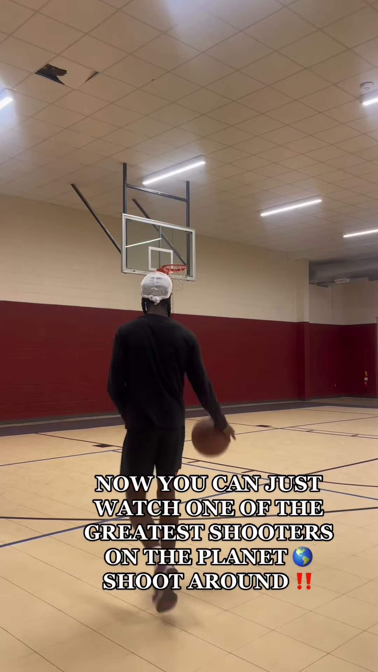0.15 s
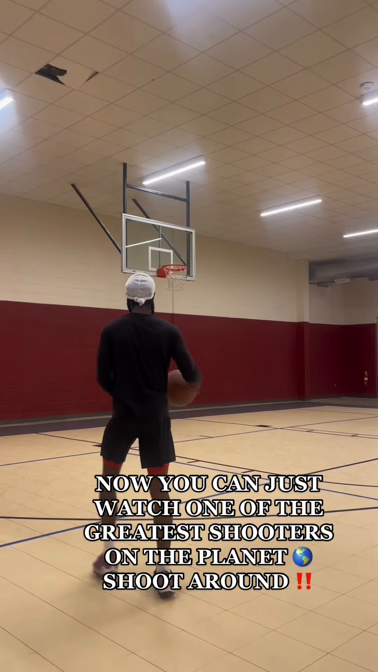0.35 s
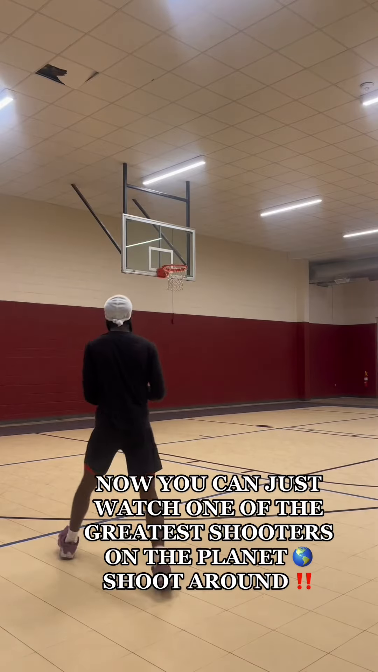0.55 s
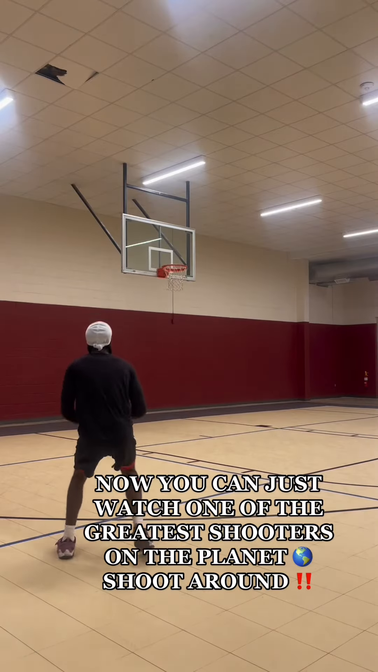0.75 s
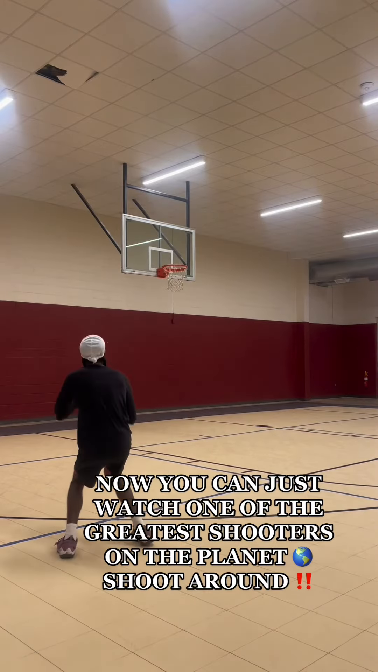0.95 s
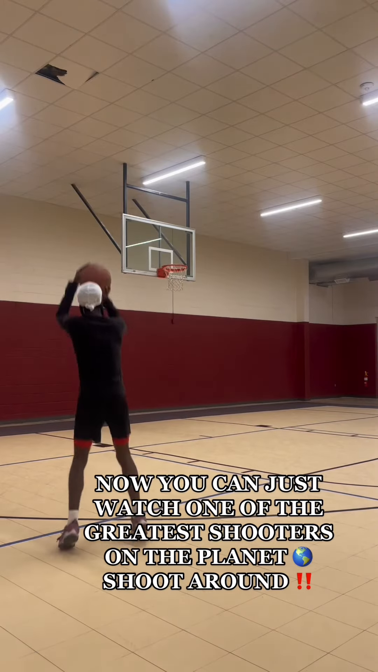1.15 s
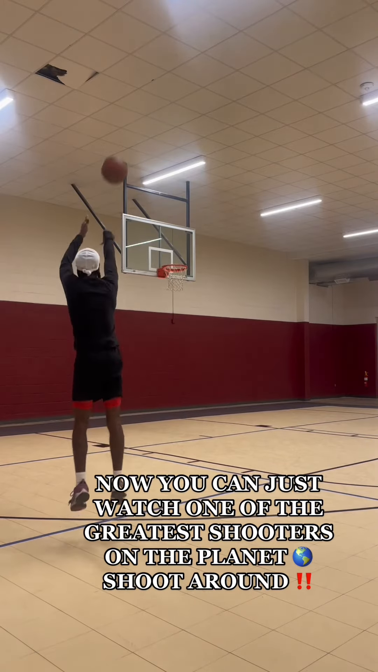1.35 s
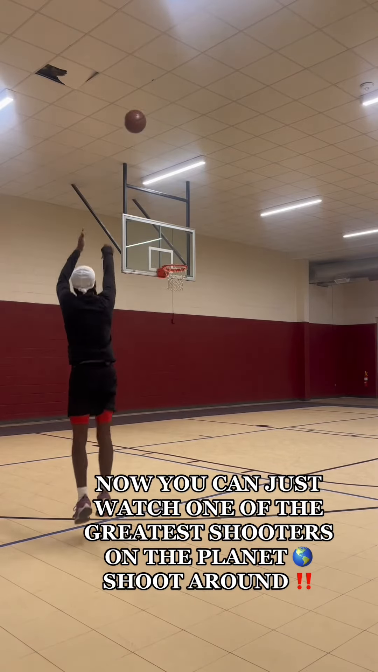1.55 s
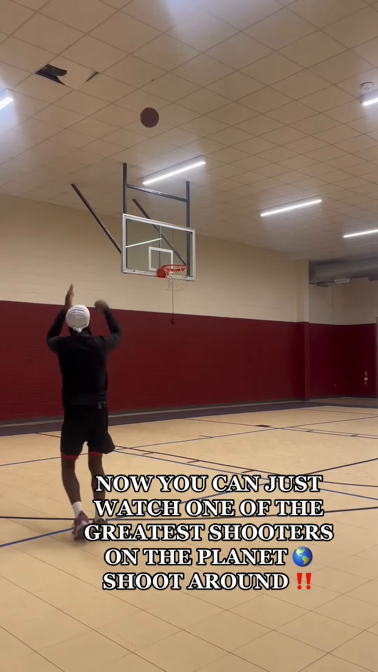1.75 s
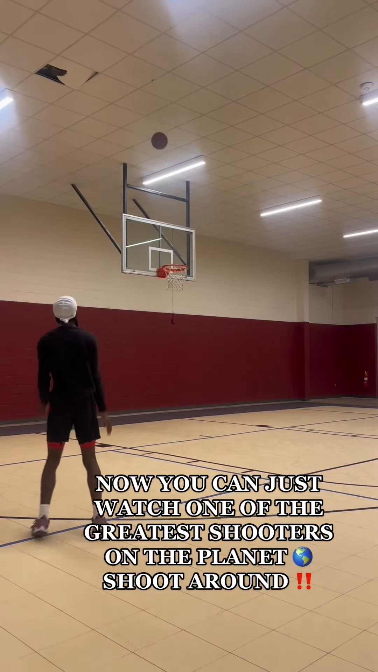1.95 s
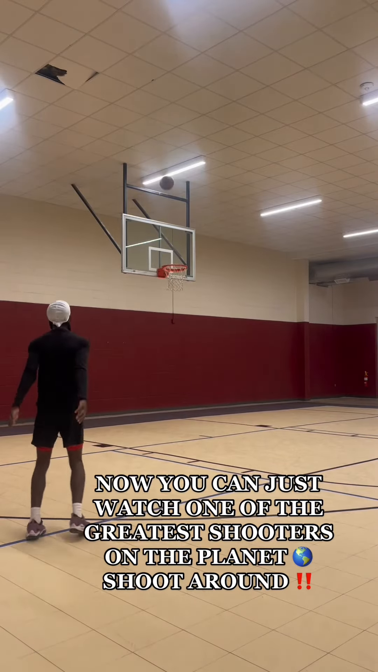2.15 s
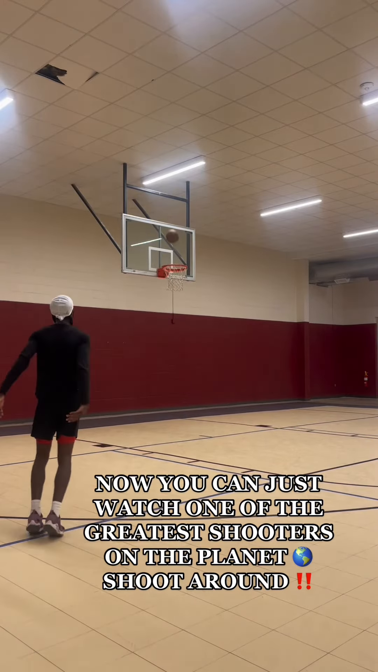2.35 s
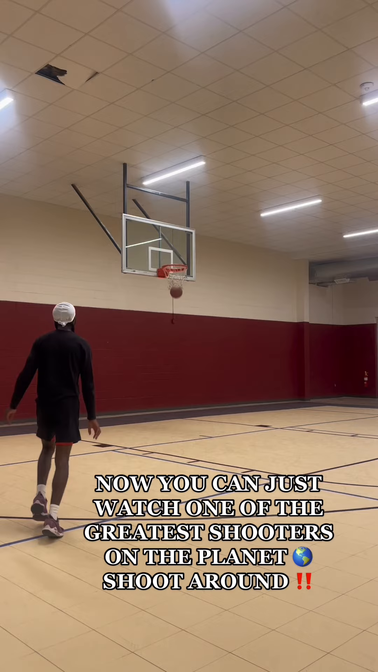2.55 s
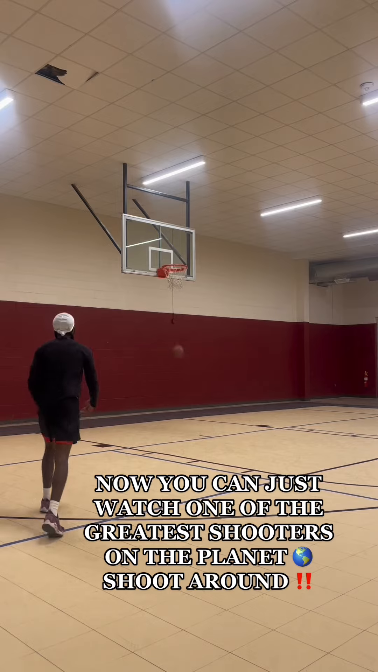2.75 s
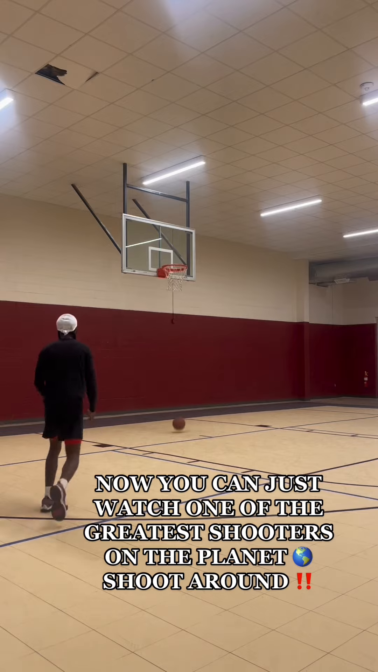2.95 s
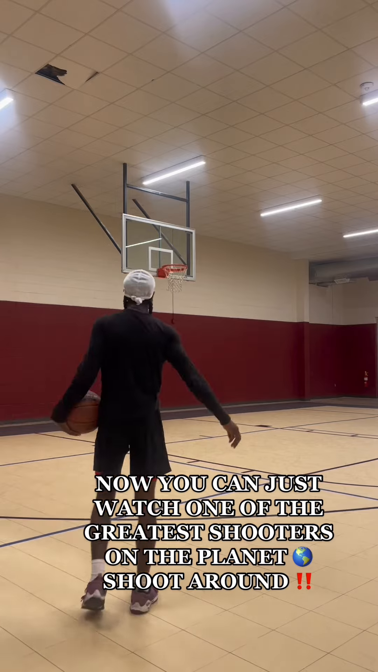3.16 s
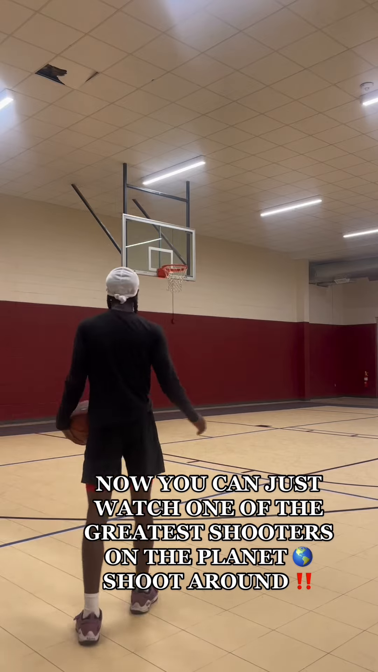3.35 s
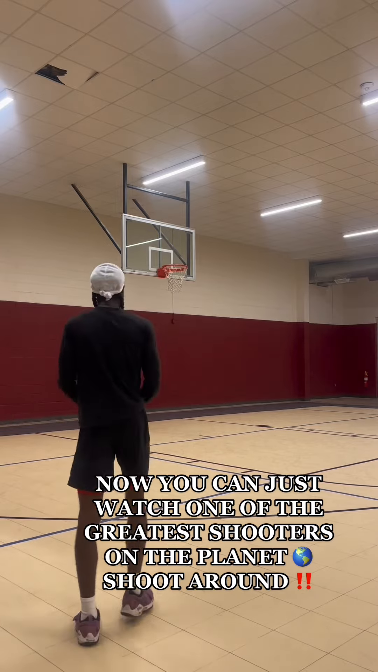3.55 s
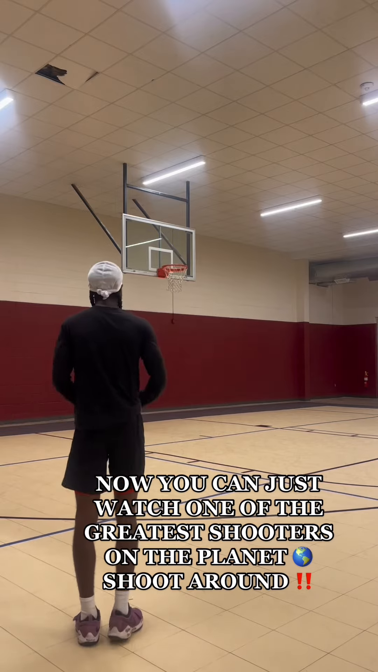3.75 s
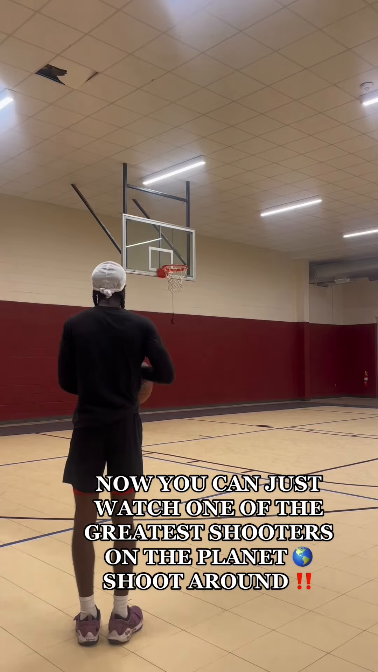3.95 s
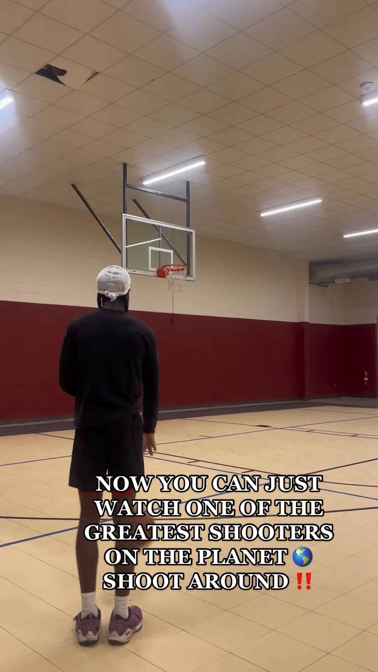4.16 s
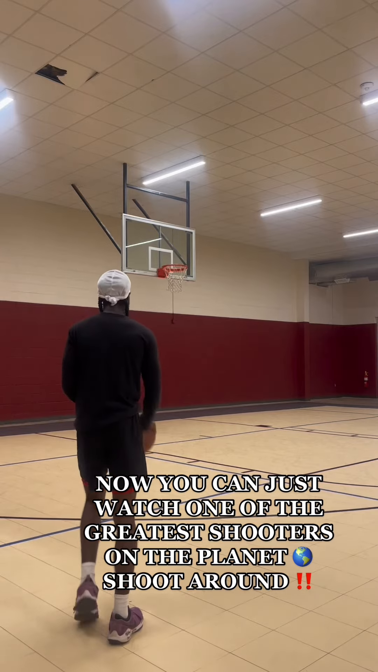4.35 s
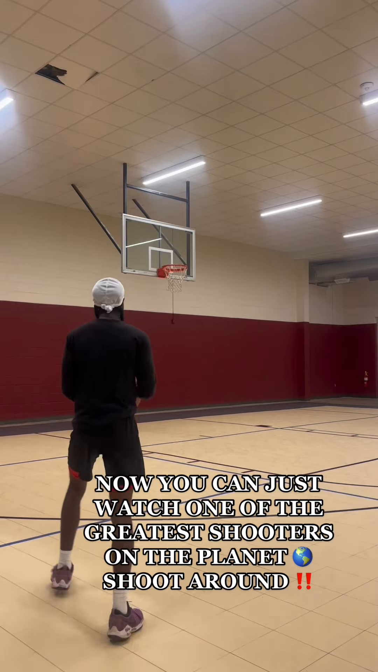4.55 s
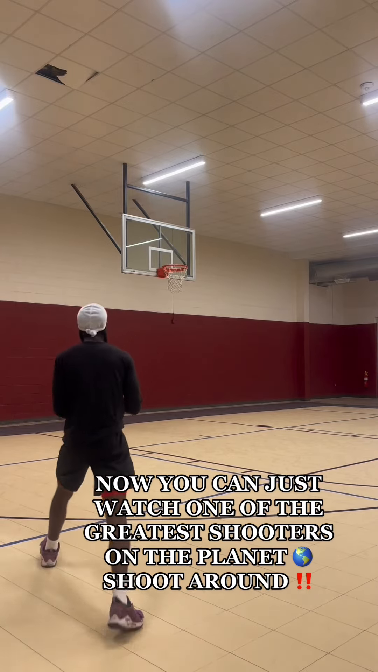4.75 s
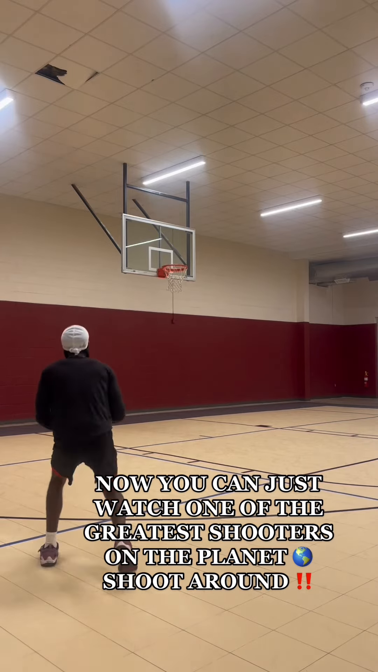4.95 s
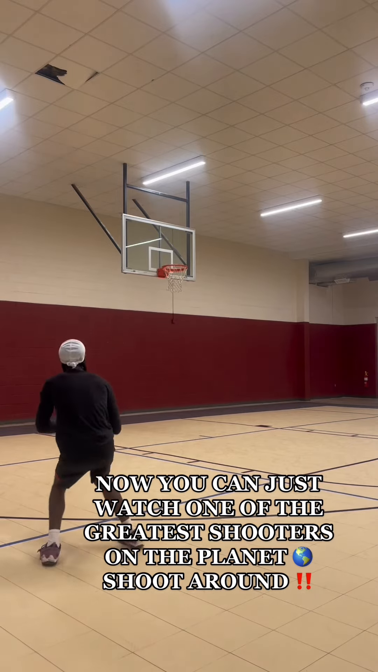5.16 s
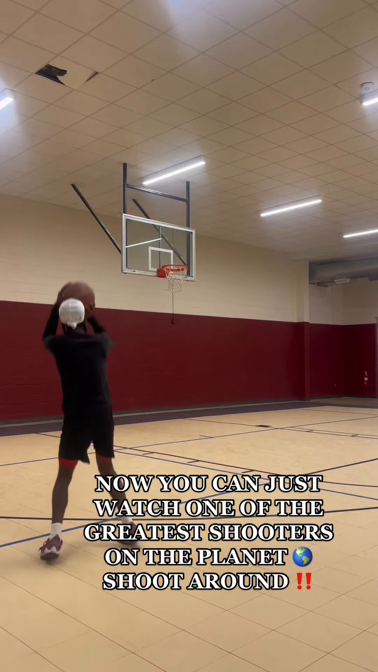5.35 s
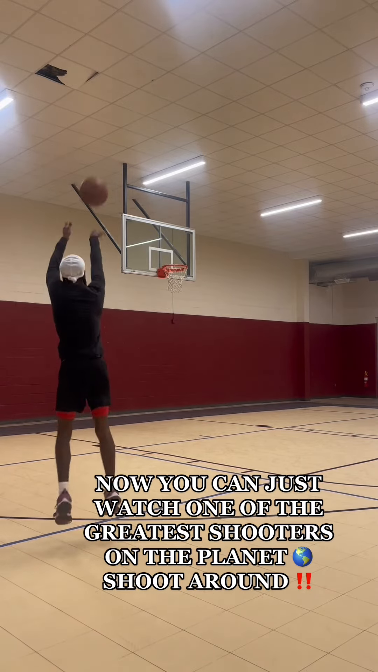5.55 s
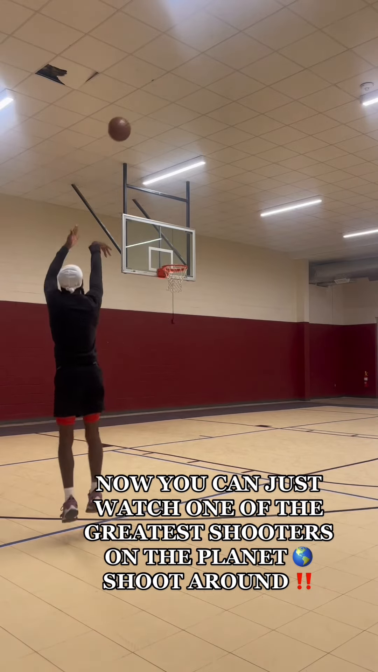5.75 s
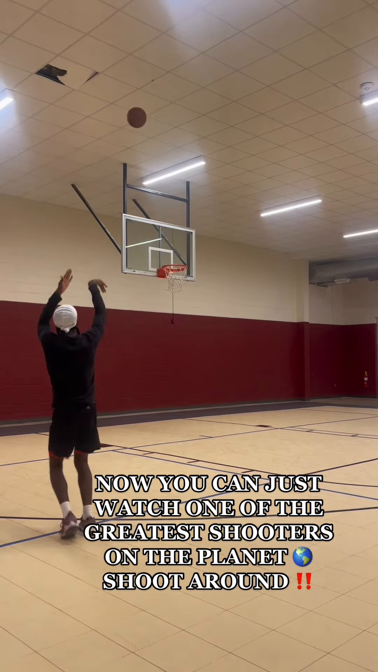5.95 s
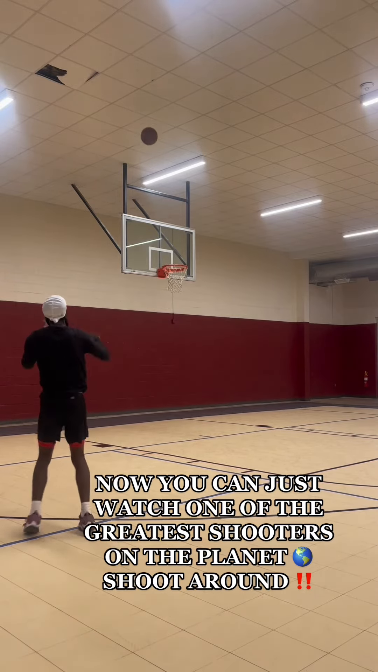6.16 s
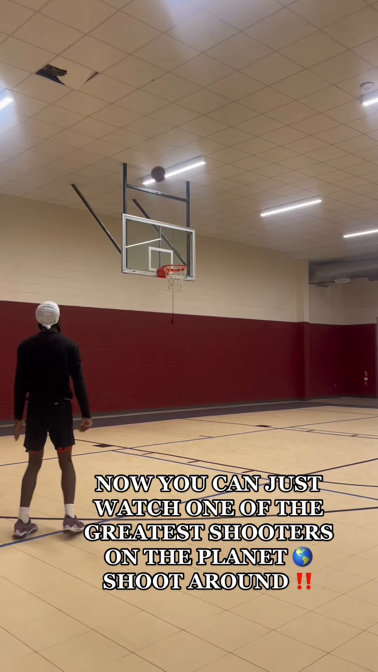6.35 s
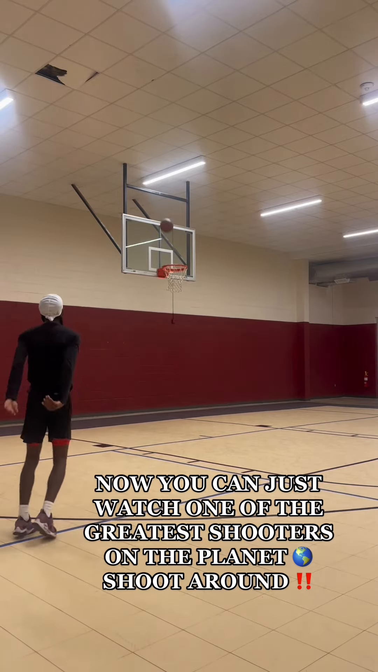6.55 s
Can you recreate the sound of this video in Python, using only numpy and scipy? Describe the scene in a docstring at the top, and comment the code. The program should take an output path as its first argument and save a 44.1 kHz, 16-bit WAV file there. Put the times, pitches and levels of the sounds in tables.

```python
"""Basketball on the sprung wooden floor of a large gym, a few metres away.
A bounce rings out, soles step and scuff, fingers snap off a shot (1.6 s). The ball rushes through the
net, shakes the hoop (2.5 s) and lands; hoop and hall tail cut off abruptly (3.0 s). A hand slaps the
ball (3.4 s), it bounces (4.2 s), and more steps lead to a second shot (5.8 s). Throughout, ventilation
rumbles, and the blows excite a long hall tail with a flutter between the end walls."""
import sys
import numpy as np
from scipy import signal
from scipy.fft import rfft, irfft
from scipy.io import wavfile
from scipy.ndimage import uniform_filter1d

SR = 44100
rng = np.random.default_rng(int(sys.argv[2]) if len(sys.argv) > 2 else 0)


def bounce(signal):
    """Save signal as a 16-bit WAV file at the path given by the first command-line argument."""
    frames = np.transpose(np.atleast_2d(signal))
    limited = np.clip(frames, -1, 1)
    pcm = np.round(limited * 32767).astype(np.int16)
    wavfile.write(sys.argv[1], SR, pcm)


N = 291041
SIZE, LEAD_S, CUT_S = 2 ** 19, .1, 3.0415  # work buffer, its start before time 0, abrupt cut-off

# ball on floor: (time [s], level [dB], bass [dB], body [dB], mid [dB], treble [dB], hall [dB], spot)
BOUNCES = [(-.058, -10, -6.5, -5.5, -13, 1.5, 5, "near"), (2.9199, -5.5, -7, -4.5, -11.5, -1, 2.5, "hoop"),
           (4.1652, -4.5, -2.5, -7, -7, 6.5, -3, "near")]
# click spectrum: (frequency [Hz], level [dB])
BOUNCE_SPECTRUM = [(40, 12), (80, 29), (120, 28), (170, 25), (260, 16), (400, 9.5), (600, 11.5),
                   (950, 10.5), (1200, 3.5), (1500, 6), (2200, -4), (3500, -5.5), (7000, -7.5),
                   (12000, -11.5)]
# floor boards, then air in the ball: (frequency [Hz], level [dB], rise [ms])
BOUNCE_RINGS = [(138.4, 2.5, 8.5), (262.2, -6.5, 4), (432.5, -10.5, 1.5), (674, -4.5, 1), (1186, -1, 1.1),
                (2120, -15, 0.67)]
def bounces(buses):
    """The ball hits the sprung floor; boards and enclosed air ring briefly."""
    for s, db, *tilt_db, hall_db, spot in BOUNCES:
        blow = impact(BOUNCE_SPECTRUM, BOUNCE_RINGS, tilt_db, spot, spread=.045)
        place(buses, s, undb(db) * blow, spot, hall_db)


# hand on ball: (time [s], level [dB], spot)
SLAPS = [(3.4305, -6.5, "held")]
# click spectrum: (frequency [Hz], level [dB])
SLAP_SPECTRUM = [(60, 2), (150, 10.5), (250, 10.5), (420, 3), (700, 2), (1000, -1.5), (1600, -3),
                 (2350, -1), (3000, -7.5), (4000, -5), (6000, -8), (12000, -17)]
# resonances: (frequency [Hz], level [dB], rise [ms])
SLAP_RINGS = [(460, -9, 0.93), (569.5, -5.5, 0.98), (2420, 1, 0.28), (3807, -7, 0.16)]
def slaps(buses):
    """A hand slaps the held ball."""
    for s, db, spot in SLAPS:
        blow = impact(SLAP_SPECTRUM, SLAP_RINGS, (0, 0, 0, 0), spot, spread=.03)
        place(buses, s, undb(db) * blow, spot)


# shots: (time [s], level [dB], bass [dB], mid [dB], treble [dB], spot)
RELEASES = [(1.567, -18.5, -1, 0, 0.5, "first shot"), (5.8028, -21.5, 4.5, 4, 3, "second shot")]
# click spectrum: (frequency [Hz], level [dB])
RELEASE_SPECTRUM = [(60, -2.5), (150, 7), (250, 9.5), (400, 16.5), (600, 12), (900, 2), (1500, -6),
                    (2500, -3.5), (4000, -6), (7000, -6), (12000, -12.5)]
# resonances: (frequency [Hz], level [dB], rise [ms])
RELEASE_RINGS = [(402, 2.5, 1.17), (563, -12, 5.5), (1980, 1.5, 0.13)]
def releases(buses):
    """Fingers snap off the ball at each shot."""
    for s, db, bass_db, mid_db, treble_db, spot in RELEASES:
        tilt_db = (bass_db, mid_db, mid_db, treble_db)
        blow = impact(RELEASE_SPECTRUM, RELEASE_RINGS, tilt_db, spot, spread=.045)
        place(buses, s, undb(db) * blow, spot)


# footfalls: (time [s], level [dB], bass [dB], mid [dB], treble [dB], hall [dB])
STEPS = [(0.385, -53, 19.5, 7.5, 12, 9.5), (0.491, -37.5, 6, -1.5, -6, -0.5),
         (0.802, -36, -8, 0, -2.5, 1.5), (1.885, -40, -10, -1.5, -1, 0),
         (1.999, -40.5, 13.5, -4, -18, -10.5), (2.216, -44, 8, -1, -2, -2),
         (3.198, -41.5, 14.5, 0, -3, -1.5), (3.311, -45, -4, -0.5, -9, -4.5),
         (4.6966, -38.5, 8, 5.5, -1.5, -3), (5.0654, -34.5, -8.5, 2, -3, 0), (6.111, -39, 4, -4, -14, -3),
         (6.5, -38.5, -2, 0.5, -7, -3), (6.543, -57, 11, 2, -5, -5.5)]
# click spectrum: (frequency [Hz], level [dB])
STEP_SPECTRUM = [(50, -6), (120, 6.5), (300, 17), (500, 12.5), (1000, -3), (2000, -6), (4000, -10.5),
                 (12000, -19)]
# resonances: (frequency [Hz], level [dB], rise [ms])
STEP_RINGS = [(440, 4, 1.1), (710, -4, 1.5), (1290, -8.5, 0.7)]
def steps(buses):
    """Soles land on wood: weight adds bass, knock adds mids, hardness adds treble."""
    for s, db, weight_db, knock_db, hard_db, hall_db in STEPS:
        tilt_db = (weight_db, 0, knock_db, hard_db)
        blow = impact(STEP_SPECTRUM, STEP_RINGS, tilt_db, "underfoot", spread=.07)
        place(buses, s, undb(db) * blow, "underfoot", hall_db)


# direct path, lows lost to the hall: (frequency [Hz], gain [dB])
DIRECT_PATH = [(150, -14.5), (400, 5)]
# how squarely each spot faces the listener: (gain at 5.5 kHz [dB], gain at 9.5 kHz [dB])
FACING_DB = {"near": (-5.5, -14.5), "hoop": (-2, 4), "held": (-7.5, -10.5), "first shot": (0.5, -2.5),
             "second shot": (2.5, -4), "underfoot": (-7.5, -4.5)}
SKIN_S, SKIN_HZ, RING_HALL_DB = 0.00051, 3030, -17
def impact(spectrum, rings, tilt_db, spot, spread, size=8192):
    """Direct sound and hall feed of a click plus brief rings; lows trail the treble by spread."""
    hz = np.arange(size // 2 + 1) * SR / size
    ms = np.arange(size) / SR * 1000
    trail = np.exp(-4j * np.pi * spread * np.sqrt(hz))
    click = causal_filter(spectrum, size) * trail
    click /= np.abs(irfft(click)).max()
    modes = sum(ring(ms / 1000, f, db, rise_ms / 1000) for f, db, rise_ms in rings)
    ringing = trail * rfft(modes)
    # pebbled skin or sole lands bit by bit, smearing the treble
    sharp = 1 / (1 + (hz / SKIN_HZ) ** 4)
    skin = sharp + (1 - sharp) * rfft(scatter(SKIN_S), size)
    facing = [(f, DIRECT_PATH[-1][1] + db) for f, db in zip((5500, 9500), FACING_DB[spot])]
    direct = click * skin * causal_filter(DIRECT_PATH + facing, size) + ringing
    feed = click + undb(RING_HALL_DB) * ringing  # rings face the listener, not the hall
    bass, body, mid, treble = tilt_db
    tilt = [(170, bass), (290, body), (480, mid), (1200, mid), (2500, treble / 2), (6000, treble)]
    return irfft(np.array([direct, feed]) * causal_filter(tilt, size))[:, :size * 3 // 4]


# near echoes per spot, the first off a flat surface: (lag [ms], ...)
ECHO_LAGS_MS = {"near": (2.4, 8.5, 24, 51, 58), "hoop": (3.4, 9, 20, 62), "held": (2.5, 15, 21, 55),
                "first shot": (2.5, 15, 22, 75), "second shot": (11.3, 27, 45, 67),
                "underfoot": (3.5, 17, 35, 55)}
# their strengths: (gain [dB], ...)
ECHO_GAINS_DB = {"near": (-12, -12.5, -14.5, -17.5, -15.5), "hoop": (-9, -7.5, -7.5, -13.5),
                 "held": (-3, -18.5, -17, -17), "first shot": (2, -7.5, -10.5, -13),
                 "second shot": (-0.5, -10, -12, -16), "underfoot": (-4.5, -7, -18, -17)}
PANEL_BAND_HZ, SMEAR_PER_LAG = (1500, 10500), .06
def place(buses, s, blow, spot, hall_db=0):
    """Mixes in a blow and its near echoes; beams and panels mirror lows and scatter the rest."""
    direct, feed = blow
    near, send = buses[:, int(s > CUT_S)]
    add(near, s, direct)
    add(send, s, feed * undb(hall_db))
    lows = signal.sosfilt(signal.butter(2, 700, fs=SR, output="sos"), direct)
    highs = signal.sosfilt(signal.butter(1, PANEL_BAND_HZ, "band", fs=SR, output="sos"), direct - lows)
    for k, (ms, db) in enumerate(zip(ECHO_LAGS_MS[spot], ECHO_GAINS_DB[spot])):
        scattered = lows + np.convolve(highs, scatter(SMEAR_PER_LAG * ms / 1000))[:len(direct)]
        add(near, s + ms / 1000, undb(db) * (scattered if k else direct))


# cord noise: (frequency [Hz], level [dB])
NET_SPECTRUM = [(200, 0), (500, 7), (1500, -2), (2400, -3), (3200, -6), (6000, -5.5), (8500, -0.5),
                (11000, -10), (12600, -14), (13200, -31)]
NET_S, NET_RISE_S, FLICK_DB = 2.454, 0.0087, 3
def net():
    """The ball rushes through the cords, which flick one by one and swing on softly."""
    rush = envelope(NET_S, db=-29.5, rise_s=NET_RISE_S, fall_s=0.061)
    swing = envelope(NET_S, db=-39, rise_s=NET_RISE_S, fall_s=0.3)
    flicks = uniform_filter1d(np.repeat(rng.standard_normal(SIZE // 64), 64), size=32)
    return (rush + swing) * undb(FLICK_DB * flicks) * noise(NET_SPECTRUM)[0]


# hoop and board: (centre [Hz], half-width [Hz], level [dB], t60 [s])
HOOP_BANDS = [(32.9, 5.8, -39.5, 2.5), (57, 24, -40.5, 6.9), (112, 74, -27.5, 0.6), (208, 230, -33, 0.53)]
HOOP_S, HOOP_RISE_S = 2.462, 0.0027
def hoop():
    """Tugged by the net, the board thumps; rim, board and struts shudder in low bands."""
    t = np.arange(SR) / SR
    hz = np.arange(SR // 2 + 1)
    shudder = 0
    for centre_hz, width_hz, db, t60_s in HOOP_BANDS:
        band = irfft(rfft(rng.standard_normal(SR)) * np.exp(-((hz - centre_hz) / width_hz) ** 2))
        shudder += band / band.std() * undb(db - 60 * t / t60_s)
    thump = ring(t, hz=96.5, db=-29.5, rise_s=0.017)
    return shudder * (1 - np.exp(-t / HOOP_RISE_S)) + thump


# sole drags: (peak time [s], level [dB], rise per 20 dB [s])
SCUFFS = [(0.394, -61.5, 0.0061), (0.501, -63, 0.024), (0.825, -58, 0.028), (.905, -66, 0.066),
          (1.123, -59, 0.057), (1.927, -50, 0.037), (2.07, -65.5, 0.64), (3.216, -58, 0.02),
          (3.658, -47, 0.22), (4.81, -67, 0.18), (5.095, -56, 0.031), (5.162, -62, 0.052),
          (5.391, -61.5, 0.057), (6.163, -52, 0.055), (6.229, -61.5, 0.093), (6.329, -53, 0.11)]
# friction noise: (frequency [Hz], level [dB])
SCUFF_SPECTRUM = [(300, -18.5), (1000, -4), (3000, -1.5), (6000, 1.5), (11500, 0.5), (13000, -9)]
def scuffs():
    """Soles drag in many small slips of uneven size: grainy noise."""
    slips = np.repeat(rng.exponential(size=SIZE // 64), 64)
    grain = undb(2.5 * uniform_filter1d(slips, 64))
    grain /= np.sqrt(np.mean(grain ** 2))
    swells = sum(envelope(*row, fall_s=0.047) for row in SCUFFS)
    return grain * swells * noise(SCUFF_SPECTRUM)[0]


# brief rubs: (peak time [s], level [dB], fall per 20 dB [s])
RASPS = [(1.136, -57.5, 0.04), (1.22, -53, 0.0055), (1.238, -53, 0.017), (1.95, -47.5, 0.0055),
         (2.224, -61.5, 0.011), (4.808, -51.5, 0.014), (5.101, -54, 0.0092), (5.35, -54, 0.012),
         (5.448, -58, 0.018), (5.4955, -54, 0.052), (5.5434, -58, 0.017)]
# friction noise: (frequency [Hz], level [dB])
RASP_SPECTRUM = [(500, 1), (1200, -5.5), (2000, -2), (3000, -15), (6000, -21), (12000, -23.5)]
def rasps():
    """Short, dry bursts of rubbing noise."""
    bursts = sum(envelope(s, db, rise_s=0.02, fall_s=fall_s) for s, db, fall_s in RASPS)
    return bursts * noise(RASP_SPECTRUM)[0]


# diffuse hall tail: (frequency [Hz], t60 [s], level [dB])
# the last row is a treble cut above about 12.5 kHz, not the hall's decay
HALL_BANDS = [(40, 0.28, -5.5), (67.6, 0.8, 0.5), (116, 1.83, -0.5), (184, 1.77, -1), (234, 1.75, -2),
              (392, 0.81, -0.5), (660, 1, -3), (1090, 1.53, -4), (2080, 1.69, -9.5), (4200, 1.306, -8.5),
              (7280, 0.78, -6), (7960, 0.63, -2), (12420, 0.23, -4.5), (13000, .2, -27.5)]
# single returns off far walls: (lag [ms], gain [dB])
FAR_WALLS = [(95, -16), (114, -19)]
TAIL_DB, TAIL_RISE_S, CLUMP_DB, CLUMP_FADE_S = -29, 0.0015, 5, 0.094
FIRST_WALLS_S, THIN_DB = .049, -4
FLUTTER_TRIP_MS, FLUTTER_DB, TRIP_LOSS_DB = 159.5, -17, 8
def hall():
    """Mid and side spectra of the hall: decaying noise with its top cut, plus end-wall flutter."""
    size = 2 ** 17
    t = np.arange(size) / SR
    # early reflections clump, then even out
    clumps = uniform_filter1d(np.repeat(rng.exponential(size=size // 128), 128), size=64) - 1
    clumping = undb(CLUMP_DB * clumps * np.exp(-t / CLUMP_FADE_S))
    diffuse = rfft(rng.standard_normal((2, size)) * clumping)
    response = 0
    for k, (hz, t60_s, db) in enumerate(HALL_BANDS):
        band = curve([(row[0], j == k) for j, row in enumerate(HALL_BANDS)], size)
        thin_db = THIN_DB * (t < FIRST_WALLS_S) * (hz > 500)  # until the first walls answer
        response += irfft(diffuse * band) * undb(db - 60 * t / t60_s + thin_db)
    response *= undb(TAIL_DB) * (1 - np.exp(-t / TAIL_RISE_S))
    flutter = [((k + 1) * FLUTTER_TRIP_MS, FLUTTER_DB - TRIP_LOSS_DB * k) for k in range(5)]
    for ms, db in flutter + FAR_WALLS:
        i = int(ms / 1000 * SR)
        echo = uniform_filter1d(uniform_filter1d(scatter(0.0018), 4), 4)  # dulled by the long path
        response[0, i:i + len(echo)] += undb(db) * echo
    return rfft(response, SIZE)


# air noise: (frequency [Hz], relative density [dB])
VENT_SPECTRUM = [(15, -76), (25, -38), (35, -10.5), (49, 1), (86, -1), (124, -5.5), (147, -7), (332, -32),
                 (543, -37), (1110, -33), (1250, -40), (1730, -47), (9000, -61.5), (11700, -106)]
VENT_DB = -53.5
def ventilation():
    """Steady rumble of moving air, mid and side."""
    return noise(VENT_SPECTRUM, channels=2) * undb(VENT_DB)


def undb(db):
    """dB to gain."""
    return 10 ** (np.asarray(db) / 20)


def curve(table, size):
    """Table value at every FFT bin, interpolated over log frequency."""
    hz = np.maximum(np.arange(size // 2 + 1) * SR / size, 1)
    knots_hz, values = np.transpose(table)
    return np.interp(np.log(hz), np.log(knots_hz), values)


def causal_filter(table, size):
    """Minimum-phase spectrum of a dB curve, by cepstral folding."""
    cepstrum = irfft(curve(table, size) * np.log(10) / 20)
    cepstrum[1:size // 2] *= 2
    cepstrum[size // 2 + 1:] = 0
    return np.exp(rfft(cepstrum))


def noise(spectrum, channels=1):
    """Shaped noise, rms 1."""
    x = irfft(rfft(rng.standard_normal((channels, SIZE))) * undb(curve(spectrum, SIZE)))
    return x / x.std()


def ring(t, hz, db, rise_s):
    """Resonance that swells for rise_s, then dies."""
    return undb(db) * t / rise_s * np.exp(1 - t / rise_s) * np.sin(2 * np.pi * hz * t)


def scatter(decay_s):
    """Unit-energy noise burst: the smear of a rough surface."""
    t = np.arange(900) / SR
    burst = rng.standard_normal(len(t)) * np.exp(-t / decay_s)
    return burst / np.sqrt(np.sum(burst ** 2))


def envelope(peak_s, db, rise_s, fall_s):
    """Gain rising 20 dB per rise_s to its peak, then falling 20 dB per fall_s."""
    gain, t = np.zeros(SIZE), np.arange(-SR // 4, SR) / SR
    add(gain, peak_s + t[0], undb(db - 20 * np.maximum(-t / rise_s, t / fall_s)))
    return gain


def add(track, s, x):
    """Mixes x into track at time s."""
    i = int((s + LEAD_S) * SR)
    track[i:i + len(x)] += x


# phase between microphone ports: (frequency [Hz], left lead [rad])
PORT_PHASE = [(0, 0), (2240, .35), (3000, .9), (4100, 1.2), (4800, 3), (5700, 6.1), (7000, 7.4),
              (8500, 9.1), (9500, 9.7), (10300, 10.4), (11250, 11.1), (12300, 12.4), (14200, 12.9)]
# diffuse sound unlike at the two ports: (frequency [Hz], side gain [ratio])
SIDE_GAIN = [(100, .015), (250, .07), (600, .55), (1500, .42), (3000, .45), (5000, .36), (10000, .2)]
def stereo(mid, side):
    """Mid and side to left and right; the left port leads in phase."""
    mid, side = rfft(mid), rfft(side) * curve(SIDE_GAIN, SIZE)
    hz = np.arange(SIZE // 2 + 1) * SR / SIZE
    turn = np.exp(.5j * np.interp(hz, *np.transpose(PORT_PHASE)))
    return irfft(np.array([(mid + side) * turn, (mid - side) / turn]))


RUB_HALL_DB, CUT_FADE_S = -7.5, 0.0058
def scene():
    """Play in one hall; all that sounds before CUT_S stops there, except the ventilation."""
    buses = np.zeros((2, 2, SIZE))  # (near / hall send, before / after the cut-off, sample)
    bounces(buses)
    slaps(buses)
    releases(buses)
    steps(buses)
    near, send = buses
    t = np.arange(SIZE) / SR - LEAD_S
    rubbing = (scuffs() + rasps() + net()) * np.array([t < CUT_S, t >= CUT_S])
    add(rubbing[0], HOOP_S, hoop())
    hall_mid, hall_side = hall()
    air_mid, air_side = ventilation()
    feed = rfft(send + undb(RUB_HALL_DB) * rubbing)
    mid = irfft(feed * hall_mid) + near + rubbing
    side = irfft(feed * hall_side)
    fade = np.clip((CUT_S - t) / CUT_FADE_S, 0, 1)
    mix = stereo(fade * mid[0] + mid[1] + air_mid, fade * side[0] + side[1] + air_side)
    return mix[:, int(LEAD_S * SR):][:, :N]


# microphone port resonance: (frequency [Hz], gain [dB])
PORT_RESONANCE = [(7000, 0), (8500, 2), (10600, 9), (11700, -2), (12400, -16), (15000, -28)]
CEILING, LOWPASS_HZ = .95, 14650
def record(dry):
    """Microphone: ports ring in the treble, peaks are rounded, the top is cut."""
    heard = irfft(rfft(dry, SIZE) * causal_filter(PORT_RESONANCE, SIZE))[:, :N]
    rounded = heard / (1 + np.abs(heard / CEILING) ** 4) ** .25
    return signal.sosfilt(signal.ellip(8, .2, 70, LOWPASS_HZ, fs=SR, output="sos"), rounded)


dry = scene()
out = record(dry)
bounce(out)
```